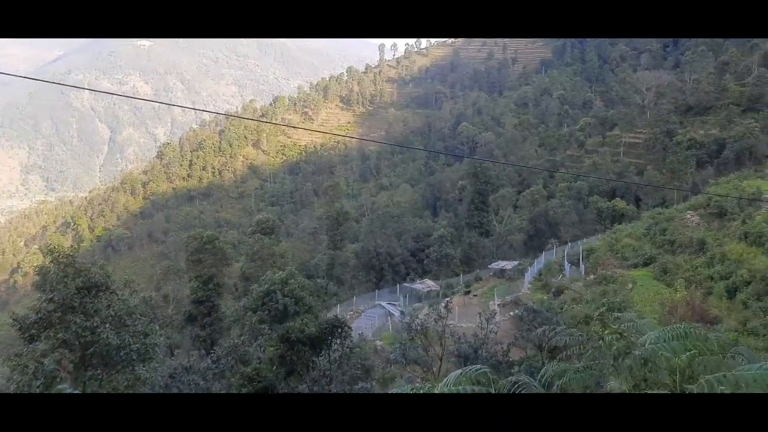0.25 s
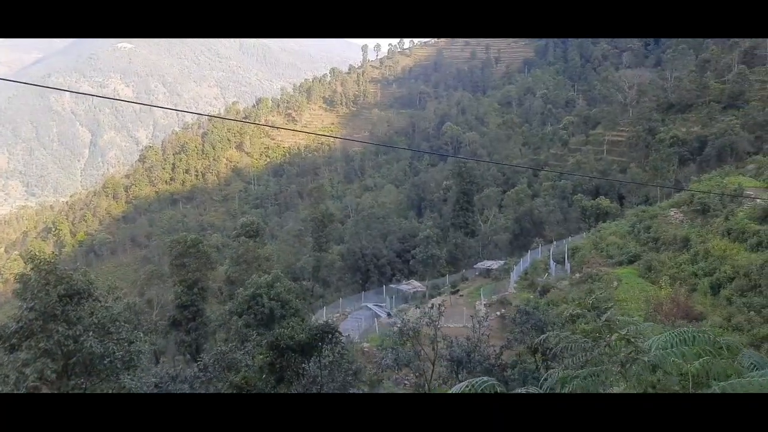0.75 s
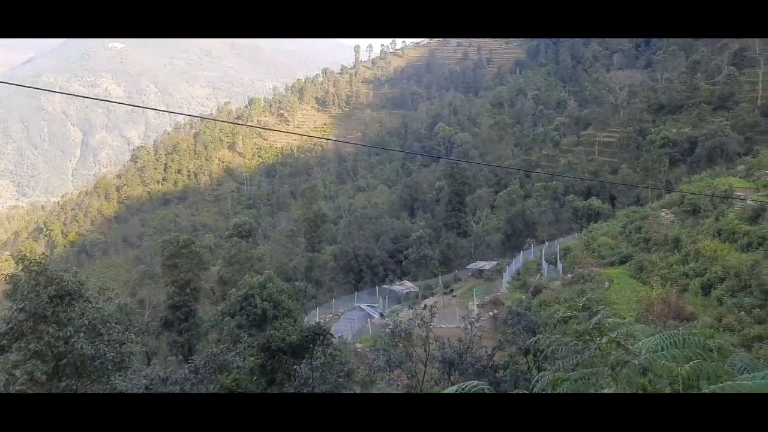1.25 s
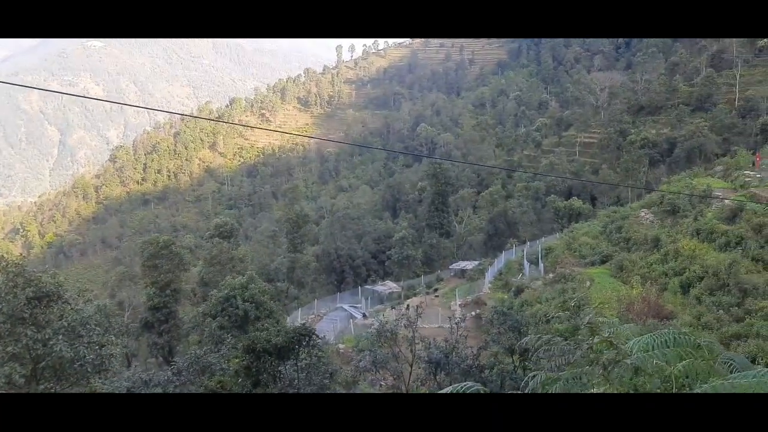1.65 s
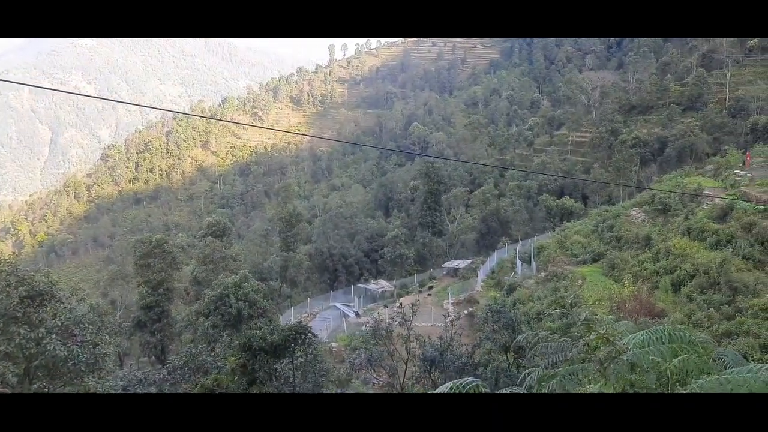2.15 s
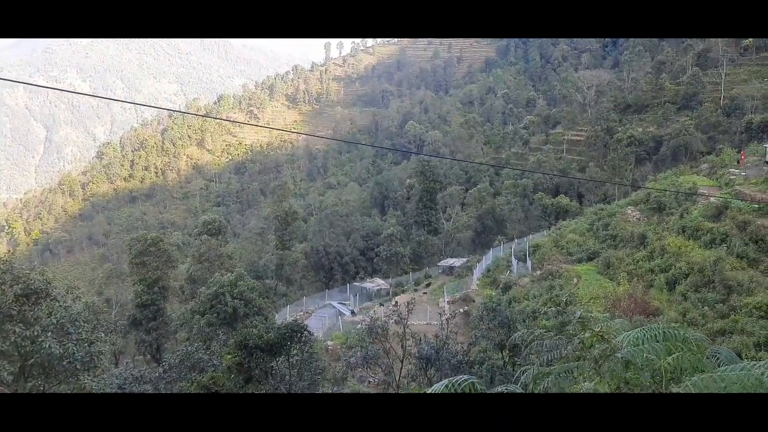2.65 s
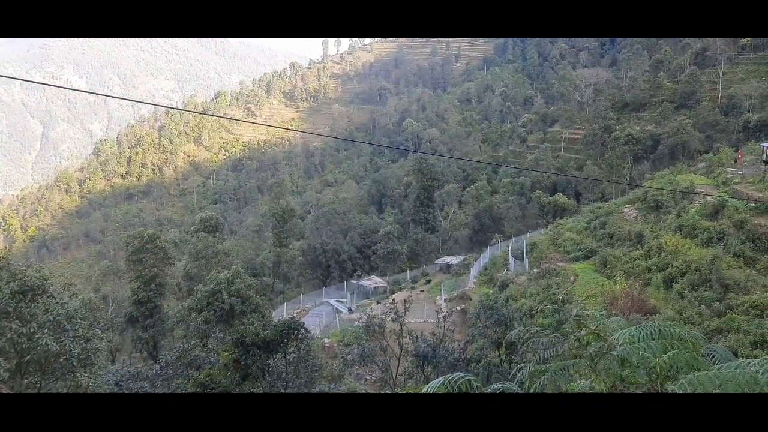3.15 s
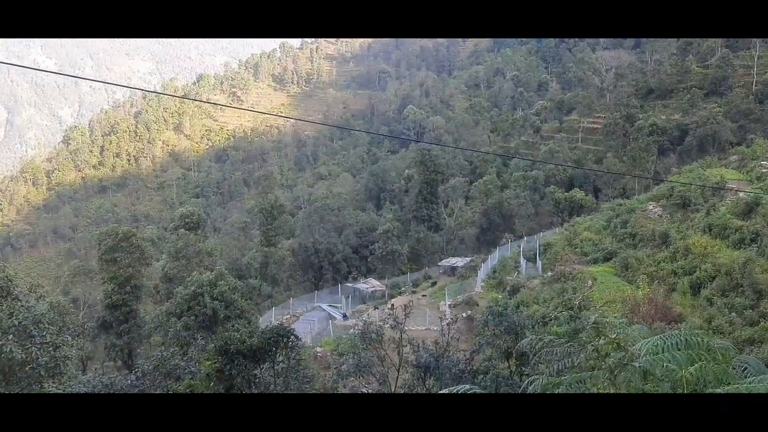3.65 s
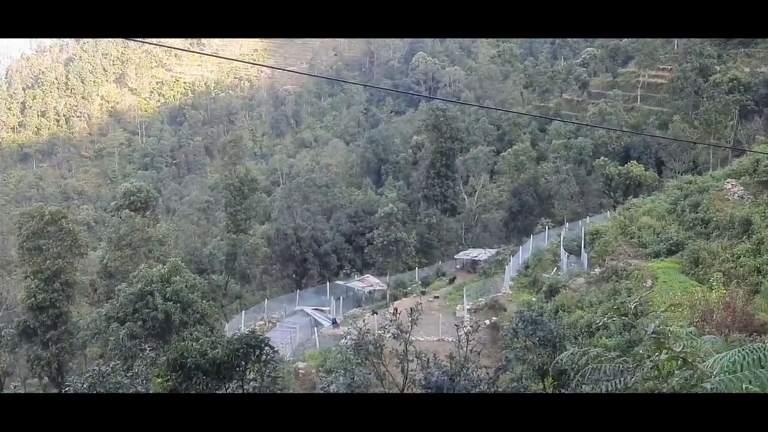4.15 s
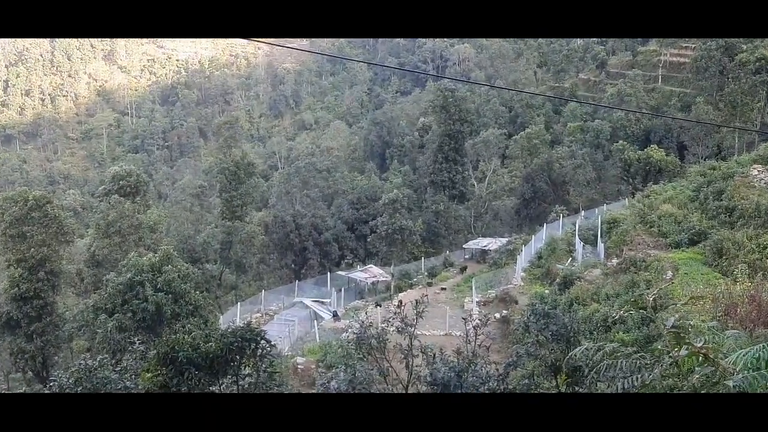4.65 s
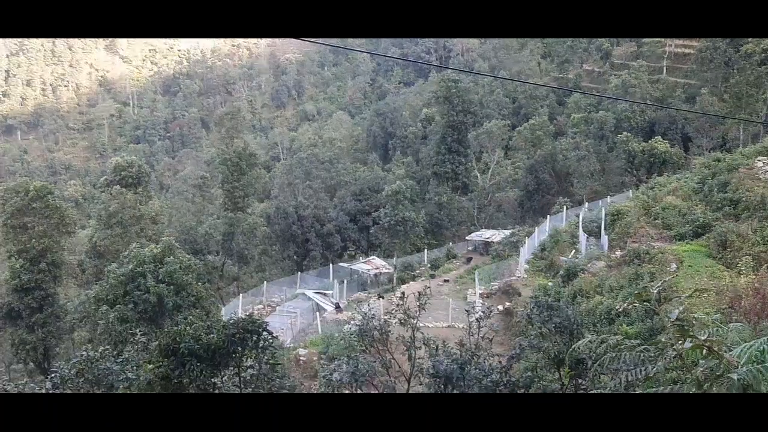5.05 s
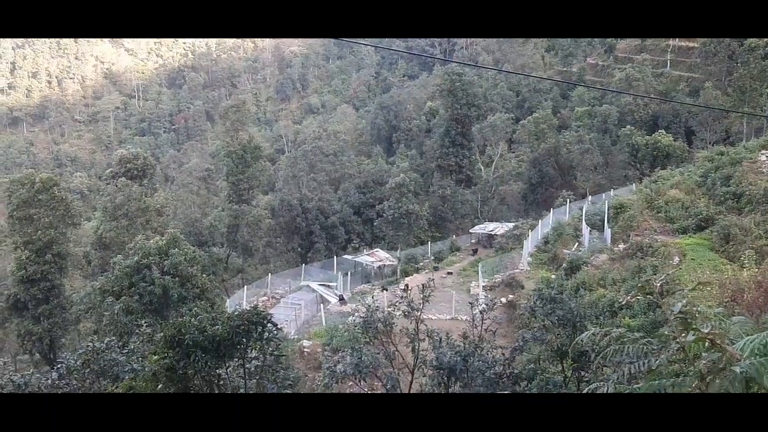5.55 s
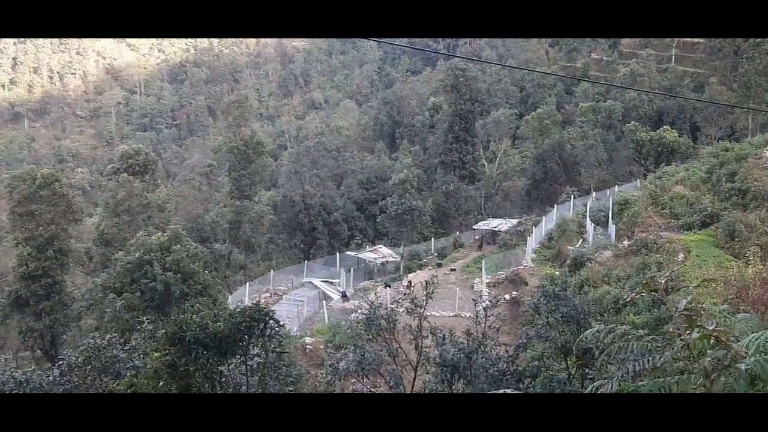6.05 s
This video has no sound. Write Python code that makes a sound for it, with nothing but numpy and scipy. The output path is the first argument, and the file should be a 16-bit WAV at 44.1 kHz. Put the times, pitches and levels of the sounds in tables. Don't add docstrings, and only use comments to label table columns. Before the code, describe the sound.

Two big dogs bark across a wooded valley, a loud hoarse higher one and a deeper chesty one. A quick opening burst gives way to spaced deep barks, then a dense overlapping run, then thinner exchanges. Slopes return short blurred echoes. Close to the handheld microphone come a hard knock, cloth rubbing, small taps, soft panting and low wind rumble; faint birds whistle far off.

```python
import sys
import numpy as np
from scipy import signal
from scipy.io import wavfile
from scipy.ndimage import uniform_filter1d

SR = 44100
rng = np.random.default_rng(int(sys.argv[2]) if len(sys.argv) > 2 else 0)


def ratio_of_db(decibels):
    return 10 ** (np.asarray(decibels, float) / 20)


def inscribe(sig):
    pcm = np.round(np.clip(np.atleast_2d(sig).T, -1, 1) * 32767)
    wavfile.write(sys.argv[1], SR, pcm.astype(np.int16))


N = 278254
MOUTH_REST_HZ = 1470


def evened(x):
    return x / np.sqrt(np.mean(x ** 2) + 1e-20)


def read(points, hz):
    f, value = np.transpose(points)
    return np.interp(np.log(hz + 1), np.log(f + 1), value)


def add(mix, start_s, sound):
    part = mix[:, max(round(start_s * SR), 0):][:, :sound.shape[1]]
    part += sound[:, :part.shape[1]]


def wander(size, hz):
    width = max(int(SR / hz / 3), 2)
    smooth = uniform_filter1d(rng.standard_normal(size), width)
    return evened(uniform_filter1d(smooth, width))


def sides(pan_db):
    return ratio_of_db([[pan_db / 2], [-pan_db / 2]])


def late_left(pair, delay_s):
    n = np.arange(pair.shape[1])
    return np.array([np.interp(n - delay_s * SR, n, pair[0]), pair[1]])


def resonate(x, hz, width_hz):
    turn = np.exp(2j * np.pi * np.cumsum(hz * np.ones(x.shape[-1])) / SR)
    r = np.exp(-np.pi * width_hz * 4 / 3 / SR)
    smooth = signal.lfilter([(1 - r) ** 3], np.poly([r, r, r]), x / turn)
    return 2 * (turn * smooth).real


def swells(rows):
    t = np.arange(0, N / SR + .01, .002)
    total = 0
    for peak_s, db, rise_s, fall_s in rows:
        slope = np.maximum((peak_s - t) / rise_s, (t - peak_s) / fall_s)
        total = total + ratio_of_db(db - 20 * slope)
    return np.interp(np.arange(N) / SR, t, 20 * np.log10(total + 1e-9))


def hiss(colour, same, patchy_db):
    frames, hz = N // 128 + 5, np.fft.rfftfreq(512, 1 / SR)
    a, b, c, d, patches = rng.standard_normal((frames, 257, 5)).T
    patches = evened(uniform_filter1d(uniform_filter1d(patches, 8, 0), 16, 1))
    same = np.clip(read(same, hz), -1, 1)[:, None]
    left = a + 1j * b
    right = same * left + np.sqrt(1 - same ** 2) * (c + 1j * d)
    z = np.array([left, right]) * ratio_of_db(read(colour, hz)[:, None] + patchy_db * patches)
    return evened(signal.istft(z, nperseg=512, noverlap=384)[1][:, :N])


def still_air():
    # f/Hz, density/dB per Hz
    colour = [(18, -46), (30, -21.5), (97, -8.5), (192, -6), (353, -3.5), (516, -3.5), (926, -15),
              (2090, -25), (2560, -26), (5620, -28), (6720, -26.5), (13000, -28)]
    # f/Hz, left-right likeness/-1..1
    likeness = [(60, 0.4), (240, 0.78), (950, 0.07), (3770, 0.33), (15000, 0.053)]
    return ratio_of_db(-73.5) * hiss(colour, likeness, patchy_db=1.4)


def breeze():
    # peak t/s, level/dB, rise/s, fall/s
    gusts = [
        (.2, -71, 1.1, 0.91),
        (.67, -64.5, 1.1, 0.17),
        (1.52, -62, 0.22, 0.19),
        (2.3, -74.5, 0.38, 2.7),
        (3.42, -63.5, 1.2, 1.32),
        (5.2, -65.5, 0.076, 0.58),
        (5.7, -66.5, 0.33, 0.2),
    ]
    band = signal.butter(3, [68, 150], "band", fs=SR, output="sos")
    a, b, c = signal.sosfilt(band, rng.standard_normal((3, N)))
    level_db = swells(gusts) + 3.5 * wander(N, 7)
    return ratio_of_db(level_db - 2) * evened(np.array([a + .6 * b, a + 1.1 * c])) * sides(-2)


def cloth():
    # peak t/s, level/dB, rise/s, fall/s
    rubs = [(.03, -49.5, 0.58, 0.11), (.55, -64.5, 0.078, 0.064), (.72, -79.5, 0.047, 0.9),
            (.875, -57, 0.27, 0.05), (.93, -64.5, 0.45, 0.15), (1.12, -57.5, 0.025, 0.049),
            (1.17, -64.5, 0.1, 0.22), (1.382, -50, 0.018, 0.023), (1.36, -59.5, 0.028, 0.047),
            (1.42, -59.5, 0.042, 0.09), (1.9, -84.5, 0.083, 1), (2.5, -71, 3, 0.13)]
    # f/Hz, density/dB per Hz
    colour = [(180, -37.5), (300, -12.5), (509, -4), (756, -5), (821, -10.5), (2830, -13), (3340, -11),
              (3570, -12.5), (15500, -16.5)]
    likeness = [(300, .6), (1500, .5), (4000, .05), (15000, 0)]  # f/Hz, left-right likeness
    grain = ratio_of_db(2.1 * wander(N, 400) + 1.4 * wander(N, 31))
    rub = hiss(colour, likeness, patchy_db=1.2) * grain
    return ratio_of_db(swells(rubs) + 4.5) * evened(rub) * sides(-1.9)


def tract(puffs, modes, mouth):
    flutter_db, flutter_hz = 2.5, 27.8
    out = 0
    for hz, width_hz, db, pan_db, same in modes:
        same = np.clip(same, 0, 1)
        pair = np.array([puffs[0], same * puffs[0] + np.sqrt(1 - same ** 2) * puffs[1]])
        pair = pair / np.std(pair, 1, keepdims=True)
        moved_hz = hz * mouth ** min(MOUTH_REST_HZ / hz, 1)
        gain = ratio_of_db(db + flutter_db * wander(pair.shape[1], flutter_hz)) * sides(pan_db)
        out = out + gain * evened(resonate(pair, moved_hz, width_hz))
    return evened(out)


def folds(t, hz, jitter, sag):
    arch = 1 - sag * (1 - signal.windows.tukey(len(t), .6))
    return np.cumsum(hz * arch * (1 + jitter * wander(len(t), 90))) / SR


def rasp(turns, count, leak):
    slams = np.floor(np.maximum.accumulate(turns / count + .1 * wander(len(turns), 50)))
    slams = evened(np.diff(slams, prepend=np.floor(slams[0])))
    puffs = (0.24 + np.exp(-(turns % 1) / 0.31)) * rng.standard_normal((2, len(turns)))
    return (slams * [[1], [0]] + leak * evened(puffs)) * ratio_of_db(2.0 * wander(len(turns), 76))


def open_mouth(t):
    return np.minimum(t / 0.023, 1) ** 2 * np.minimum((t[-1] - t) / 0.034, 1)


def unroll(times, *stages):
    t = np.arange(0, times[-1], 1 / SR)
    return t, *(np.interp(t, times, stage) for stage in stages)


def ground(x, floor_hz, delay_s, db):
    bounce = np.zeros(round(delay_s * SR) + 1)
    bounce[[0, -1]] = 1, ratio_of_db(db)
    low = signal.butter(2, [90, floor_hz], "band", fs=SR, output="sos")
    high = signal.butter(5, floor_hz, "high", fs=SR, output="sos")
    chest = signal.sosfilt(low, x) * ratio_of_db(-11.5)
    return chest + signal.sosfilt(high, signal.lfilter(bounce, 1, x) / 1.133)


def deep_bark(start_s, length_s, effort_db, top_hz, hoarse_db, glide, octave_shape):
    tone_shape = (-28, -2, 1, -1, -22)
    rasp_shape = (-10, -2, -7, -8.5, -18)
    bright_shape = (-34, -21, -21, -23, -30.5)
    # f/Hz, width/Hz, level/dB, left-right/dB, left-right likeness/0..1
    throat_modes = [(294.5, 42, 2.5, 2, .93), (480, 60, 5.5, -6.5, 0.97), (620, 170, 9, -5.5, 0.78),
                    (866, 140, 0, -10, 0.74), (1013, 160, -0.5, -3, 0.3)]
    mouth_modes = [(1350, 270, 2, -11.5, 0.79), (1610, 260, 10, -3.5, 0.077), (1907, 200, 1.5, -5, 0.26),
                   (2381, 100, -0.5, 1, 0.79), (3136, 400, -13, -1, 0.095), (4626, 520, 0, 2.5, 0.36),
                   (6100, 3400, -6.5, -2.5, 0.23), (10700, 5000, -14.5, 3, 0.11)]
    times = np.maximum.accumulate([0, .05, .55 * length_s, length_s - .04, length_s])
    t, pitch, tone_db, rasp_db, bright_db, octave_db = unroll(
        times, glide, tone_shape, rasp_shape, bright_shape, octave_shape)
    hz = top_hz * pitch
    tone_db = tone_db + effort_db
    rasp_db = rasp_db + effort_db + hoarse_db
    bright_db = bright_db + effort_db + hoarse_db + 0.29 * (effort_db + 36.5)
    octave_db = octave_db + effort_db + 0.47 * hoarse_db

    turns = folds(t, hz, jitter=0.045, sag=.2)
    octave = np.cos(4 * np.pi * turns + 1) + ratio_of_db(-9.5) * np.cos(6 * np.pi * turns + 2)
    tone = ratio_of_db(tone_db + 2.4 * wander(len(t), 70)) * np.cos(2 * np.pi * turns)
    tone = tone + ratio_of_db(octave_db + 3.5 * wander(len(t), 60)) * octave
    tone = np.sqrt(2) * tone * sides(-2.3)

    drive = rasp(turns, count=2, leak=.55)
    jaw = 0.815 + 0.14 * signal.windows.tukey(len(t), .7)
    throat = (hz / 330) ** .5 * jaw
    hoarse = ratio_of_db(rasp_db - 1.5) * tract(drive, throat_modes, throat)
    bright = ratio_of_db(bright_db) * open_mouth(t) * tract(drive, mouth_modes, throat ** 0.084)
    return start_s, (tone + hoarse + bright) * signal.windows.tukey(len(t), .3)


def deep_dog():
    # t/s, length/s, effort/dB, top f/Hz, hoarseness/dB
    sagging = [
        (0.0, 0.082, -45, 374.6, 5.2),
        (.135, 0.16, -37.5, 382.8, 10.6),
        (.3, 0.26, -53.5, 383, 7.8),
        (1.405, 0.18, -35.5, 339.8, 3.8),
        (2.26, 0.16, -35.5, 360.6, 5.2),
        (2.575, .17, -39.5, 349.3, 5.7),
        (5.125, 0.18, -37.5, 352.9, 4.8),
        (5.555, 0.15, -38, 349.1, 5.3),
    ]
    scooped = [
        (.555, .13, -38, 329.6, 3.5),
        (2.9, 0.18, -39.5, 333.9, 2.5),
        (3.16, 0.19, -37, 317.4, 0),
        (3.46, 0.16, -36, 309.4, -4.5),
        (3.78, 0.175, -40.5, 311, 0),
        (4.155, 0.14, -50.5, 293.8, -1.5),
    ]
    sag = (.84, .885, 1.005, .96, 0.76)
    scoop = (0.78, .9, 1.005, 1.01, .98)
    sag_octave_db = (-36.5, -2, -11.5, -15.5, -31)
    scoop_octave_db = (-20, -8.5, -8.5, -8.5, -30)
    out = np.zeros((2, N))
    for row in sagging:
        add(out, *deep_bark(*row, sag, sag_octave_db))
    for row in scooped:
        add(out, *deep_bark(*row, scoop, scoop_octave_db))
    return ground(late_left(out, .00004), floor_hz=195, delay_s=0.00034, db=-7.5)


def ticks():
    # t/s, peak/dB, knock f/Hz, treble/dB
    knocks = [
        (0.027, -17.5, 980, -51.5),
        (0.049, -32.5, 1000, -28.5),
        (0.959, -35, 996, -39),
        (1.12, -39, 826, -0.5),
        (1.226, -43, 1350, -12),
        (1.238, -44.5, 770, -4),
        (1.375, -53.5, 920, 3),
        (2.117, -39.5, 517, -25),
        (2.134, -48.5, 980, -8.5),
    ]
    # t/s, peak/dB
    snaps = [(0.5372, -62), (0.5485, -51.5), (0.605, -55), (0.6567, -66), (0.88, -39.5), (1.114, -37.5),
             (1.1221, -40.5), (1.2095, -47.5), (1.299, -56), (1.4144, -62), (1.5443, -59)]
    out, t = np.zeros((2, N)), np.arange(700) / SR
    fabric = [(s, db - 35.5, 900, 37) for s, db in snaps]
    for start_s, db, hz, treble_db in [*knocks, *fabric]:
        knock = np.sin(2 * np.pi * hz * t) * ratio_of_db(-60 * t / 0.01) * np.minimum(t / 0.0011, 1)
        snap = np.diff(rng.standard_normal((2, 701))) * ratio_of_db(treble_db - 60 * t / 0.0085)
        add(out, start_s, ratio_of_db(db) * (0.84 * knock + snap))
    return out


def high_bark(start_s, go_s, effort_db, top_hz, open_db, jaw_hz, hold_s, rasp_shape, teeth_shape):
    glide = (.95, .97, 1.01, .99, .95)
    # level/dB, at the same stages
    tone_shape = (-28, -10.5, -0.5, 0.5, -31.5)
    bright_shape = (-37, -15, -2.5, -0.5, -15)
    # f/Hz, width/Hz, level/dB, left-right/dB, left-right likeness/0..1
    throat_modes = [(480, 500, -9, -5, 0.97), (668, 240, 9, -3, 1), (816, 130, 7.5, -1.5, 0.7),
                    (980, 80, -2, -5, 1)]
    mouth_modes = [(1386.5, 73, 6, -5.5, 1), (1521, 130, 4, -8.5, 0.44), (1910, 110, -15, 1, .7)]
    teeth_modes = [(2517, 350, -8.5, -1, 0.34), (3200, 450, -8.5, -0.5, 0.066), (4540, 430, -23, 0, 0.077),
                   (6150, 2200, -23.5, -2, 0.2), (7300, 1500, -19.5, -1.5, 0.14),
                   (11300, 4300, -33, -6.5, .1)]
    times = [0, .03, go_s - hold_s, go_s, go_s + .06]
    t, pitch, mouth_hz, teeth_db, tone_db, rasp_db, bright_db = unroll(
        times, glide, jaw_hz, teeth_shape, tone_shape, rasp_shape, bright_shape)
    tone_db = tone_db + effort_db
    rasp_db = rasp_db + effort_db + open_db + 8.5
    bright_db = bright_db + effort_db + open_db
    teeth_db = teeth_db - 11.5 + 0.98 * (open_db + 8.0)

    turns = folds(t, top_hz * pitch, jitter=.02, sag=.15)
    tone = np.cos(2 * np.pi * turns)
    tone = tone + ratio_of_db(-22) * np.cos(6 * np.pi * turns) + ratio_of_db(-29) * np.cos(10 * np.pi * turns)
    tone = np.sqrt(2) * tone * ratio_of_db(tone_db + 2.4 * wander(len(t), 70)) * sides(-5.5)

    drive = rasp(turns, count=3, leak=.5)
    jaw = mouth_hz / MOUTH_REST_HZ
    jaw = jaw * (0.913 + 0.093 * signal.windows.tukey(len(t), .7))
    hoarse = ratio_of_db(rasp_db) * tract(drive, throat_modes, jaw ** 0.25)
    bright = tract(drive, mouth_modes, jaw) + ratio_of_db(teeth_db) * tract(drive, teeth_modes, jaw)
    bright = ratio_of_db(bright_db) * open_mouth(t) * bright
    return start_s, (tone + hoarse + bright) * signal.windows.tukey(len(t), .15)


def high_dog():
    # t/s, time to letting go/s, effort/dB, top f/Hz, open-mouth brightness/dB
    plain = [
        (.11, .1, -28.5, 522.3, -5.5),
        (3.025, .102, -28.5, 517.9, -6.5),
        (3.65, 0.1, -47, 457.6, -7.5),
        (4.37, 0.1, -32.5, 504.5, -6),
        (4.871, .112, -31.5, 525.3, -5.5),
        (5.4, 0.12, -31.5, 507.3, -8),
    ]
    drawn = [
        (.425, .125, -31.5, 497.8, -9),
    ]
    wide = [
        (3.305, .165, -32.5, 480, -3),
    ]
    jaw_hz = (1620, 1487, 1506, 1401, 1390)
    drawn_jaw_hz = (1350, 1430, 1341, 1364, 1350)
    wide_jaw_hz = (1350, 1335, 1328, 1462, 1320)
    rasp_db = (-25, -9, -1, 0, -20)
    wide_rasp_db = (-21.5, -8, 0.5, -6.5, -27.5)
    teeth_db = (-12.5, -9.5, -2, -2, -8)
    drawn_teeth_db = (-20, -21, -14, -10, -19)
    wide_teeth_db = (-23, -20, -10.5, -5.5, -13)
    out = np.zeros((2, N))
    for row in plain:
        add(out, *high_bark(*row, jaw_hz, .04, rasp_db, teeth_db))
    for row in drawn:
        add(out, *high_bark(*row, drawn_jaw_hz, .055, rasp_db, drawn_teeth_db))
    for row in wide:
        add(out, *high_bark(*row, wide_jaw_hz, .12, wide_rasp_db, wide_teeth_db))
    return ground(late_left(out, 0.00016), floor_hz=383, delay_s=0.00046, db=-6.5)


def birds():
    # t/s, length/s, start f/Hz, blur/Hz, level/dB
    whistles = [(.372, 0.05, 2390, 210, -56.5), (.38, 0.074, 2930, 190, -66), (1.26, 0.12, 1160, 6, -75),
                (2.598, 0.024, 2260, 14, -56.5), (2.64, 0.32, 1165, 21, -76.5),
                (3.54, 0.13, 4600, 9.8, -81), (3.65, 0.071, 3790, 22, -74.5), (3.69, 0.075, 2456, 220, -52),
                (3.415, 0.051, 2420, 260, -43.5), (3.42, 0.052, 2970, 350, -54),
                (3.715, 0.072, 2830, 210, -59.5), (3.935, 0.13, 3790, 67, -80.5),
                (3.96, 0.21, 1190, 25, -76), (4.05, 0.58, 4610, 700, -77.5), (3.97, 0.15, 2870, 17, -75.5)]
    chips = [
        (4.61, 0.11, 7980, 902, -80),
        (5.85, 0.053, 7970, 600, -72.5),
        (5.87, 0.091, 7840, 700, -83),
    ]
    lingering = [
        (.29, 0.18, 1460, 260, -66.5),
        (3.5, .19, 1520, 378, -62.5),
        (3.52, 0.25, 2400, 300, -71),
        (4.5, .13, 2540, 45, -72.5),
        (4.5, 0.11, 1614, 90, -69.5),
        (5.02, .12, 2540, 199, -70.5),
        (5.3, 0.069, 1750, 79, -76),
    ]
    out = np.zeros((2, N))
    for calls, drop in (whistles, .01), (chips, .07), (lingering, .01):
        for start_s, length_s, hz, blur_hz, db in calls:
            size = round(length_s * SR)
            glide_hz = hz * (1 - drop * np.maximum(np.arange(-4000, size) / size, 0))
            note = resonate(rng.standard_normal(len(glide_hz)), glide_hz, blur_hz)
            note = evened(note[-size:]) * signal.windows.tukey(size, .6)
            add(out, start_s, ratio_of_db(db) * sides(-2.0) * note)
    return out


def panting():
    # peak t/s, level/dB, rise/s, fall/s
    strokes = [
        (1.54, -60.5, 0.26, 0.18),
        (2.03, -60, 0.32, 0.43),
        (2.17, -77, 0.61, 0.67),
        (2.42, -56, 0.33, 0.085),
        (2.68, -58, 0.14, 0.21),
        (3.11, -62, 0.24, 0.52),
        (3.3, -59, 0.87, 0.32),
        (3.48, -84.5, 0.15, 4),
        (3.94, -71.5, 0.76, 0.32),
    ]
    # f/Hz, width/Hz, level/dB, left-right/dB, left-right likeness/0..1
    mouth_modes = [(2414, 330, 0.013, -1.2, 0.71), (2830, 390, 0.021, -1.5, 0.36)]
    teeth_modes = [(4700, 1500, -4, 2, 0.24), (6200, 2900, 12.5, 2.3, 0.33), (7470, 650, -6, 0.87, 0.44)]
    # t/s, f/Hz, level/dB
    chest = [
        (1.9, 101.5, -83),
        (2.028, 110.4, -76),
        (2.43, 102, -67),
        (2.917, 105, -81),
        (2.944, 99, -64.5),
        (3.051, 115, -76.5),
    ]
    t, rush_db = np.arange(N) / SR, swells(strokes)
    teeth_db = -68.5 + 1.3 * (rush_db + 60.5)
    air = rng.standard_normal((2, N)) * ratio_of_db(0.71 * wander(N, 150) + 0.65 * wander(N, 3.7))
    rush = ratio_of_db(rush_db) * tract(air, mouth_modes, 0.85)
    teeth = ratio_of_db(teeth_db) * tract(air, teeth_modes, 0.81)
    s, hz, db = np.transpose(chest)
    turns = np.cumsum(np.interp(t, s, hz) * (1 + 0.0066 * wander(N, 29))) / SR
    hum = np.sin(2 * np.pi * turns) + ratio_of_db(-8.0) * np.sin(4 * np.pi * turns)
    hum = ratio_of_db(np.interp(t, s, db + 2, -120, -120)) * hum * sides(-3)
    return late_left(rush + teeth, .00017) + hum


def valley(x, sent, tail_db):
    # f/Hz, t60/s
    slopes = [(150, 0.58), (400, 0.64), (900, 0.44), (2000, 0.18), (6000, 0.32)]
    # t/s, level/dB
    terraces = [
        (.04, -14.5),
        (0.099, -22),
        (0.148, -31.5),
        (.27, -43),
    ]
    taps = np.zeros((2, SR))
    at = np.arange(900, SR - 20, 20) + rng.integers(0, 20, (2, (SR - 901) // 20))
    np.put_along_axis(taps, at, rng.choice([-1., 1.], at.shape), 1)
    taps[1] = 0.54 * taps[0] + 0.82 * taps[1]
    hz, t, z = signal.stft(taps, SR, nperseg=256)
    decay = ratio_of_db(-60 * t / read(slopes, hz)[:, None])
    tail = signal.istft(z * decay, SR, nperseg=256)[1]
    tail = ratio_of_db(tail_db) * tail / np.linalg.norm(tail[0])
    for s, db in terraces:
        scatter = rng.standard_normal((2, 1200)) * np.hanning(1200)
        add(tail, s, ratio_of_db(db) * (scatter + scatter[::-1]) / np.linalg.norm(scatter))
    tail = signal.lfilter(*signal.butter(1, 9000, fs=SR), tail)
    drift = np.arange(N) + 26 * wander(N, 14)
    blurred = np.array([np.interp(drift, np.arange(N), side) for side in sent])
    return x + signal.fftconvolve(blurred, tail, axes=1)[:, :N]


def scene():
    high = high_dog()
    far = deep_dog() + birds()
    near = panting() + cloth() + ticks() + breeze()
    return valley(high + far, ratio_of_db(-2) * high + far, tail_db=-19.5) + near + still_air()


def top_cut(x):
    return signal.sosfilt(signal.butter(12, 16530, fs=SR, output="sos"), x)


def record(dry):
    low_cut = signal.butter(1, 30, "high", fs=SR, output="sos")
    high_cut = signal.ellip(8, .5, 40, 15700, fs=SR, output="sos")
    mix = signal.sosfilt(np.vstack([low_cut, high_cut]), dry)
    return top_cut(mix)


dry = scene()
out = record(dry)
inscribe(out)
```